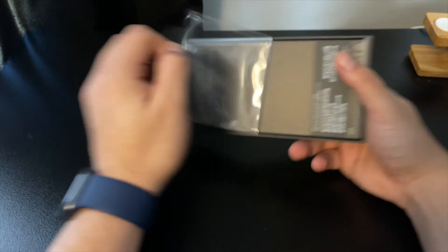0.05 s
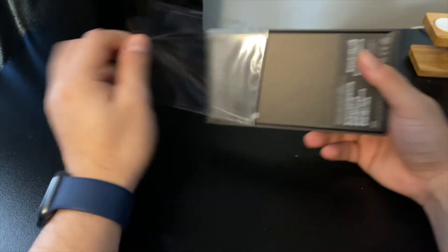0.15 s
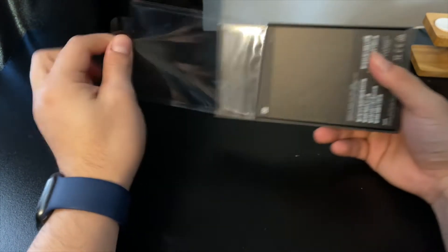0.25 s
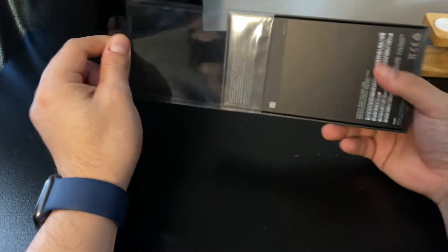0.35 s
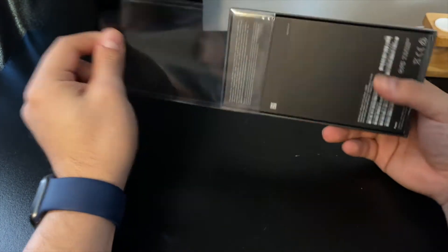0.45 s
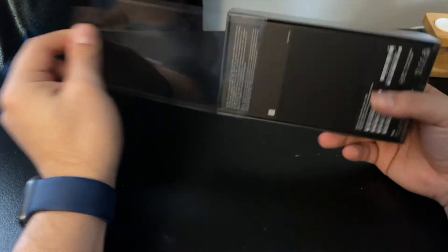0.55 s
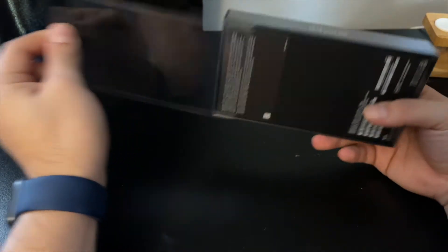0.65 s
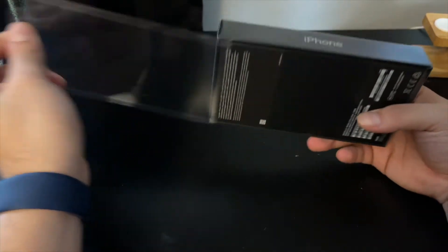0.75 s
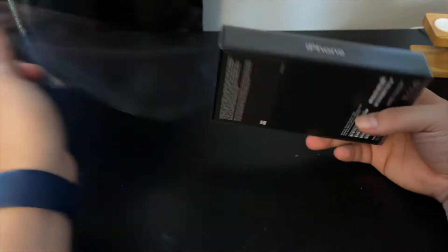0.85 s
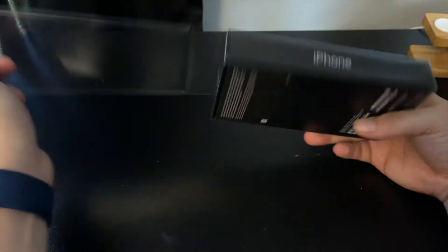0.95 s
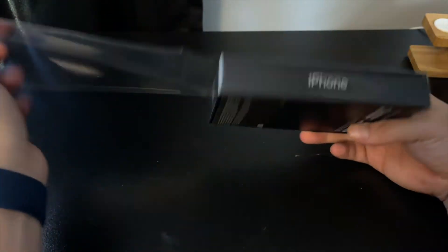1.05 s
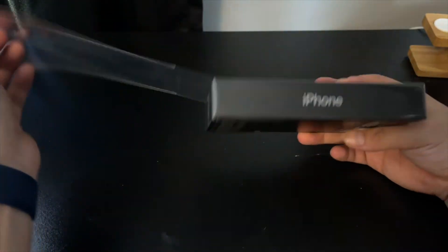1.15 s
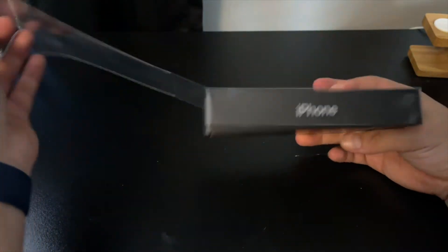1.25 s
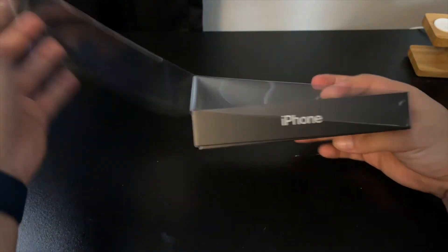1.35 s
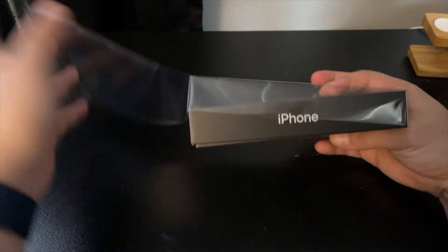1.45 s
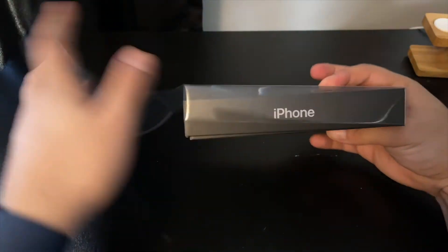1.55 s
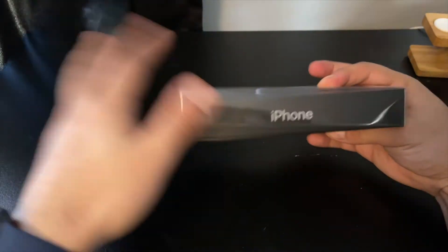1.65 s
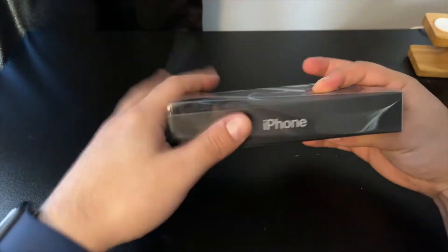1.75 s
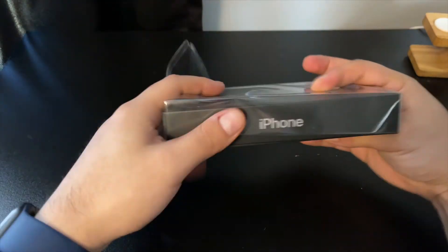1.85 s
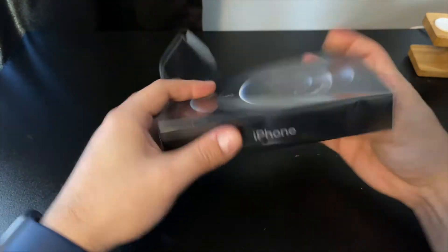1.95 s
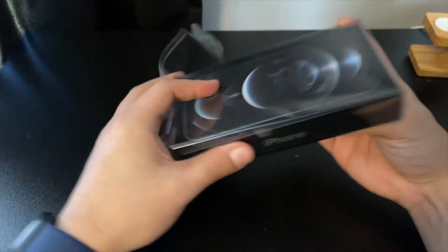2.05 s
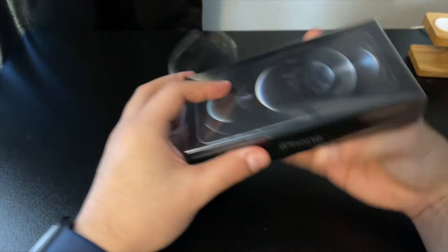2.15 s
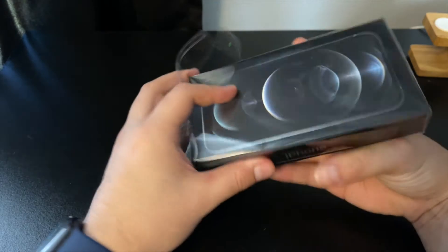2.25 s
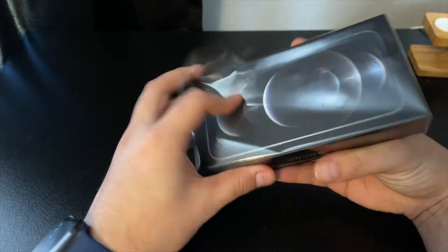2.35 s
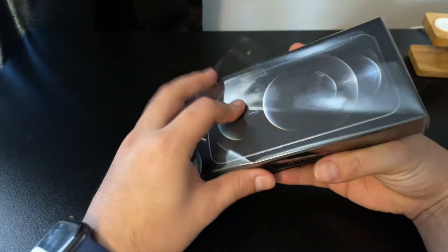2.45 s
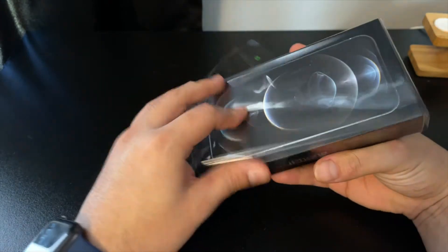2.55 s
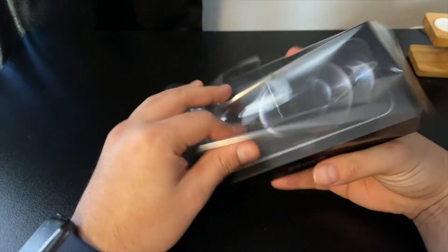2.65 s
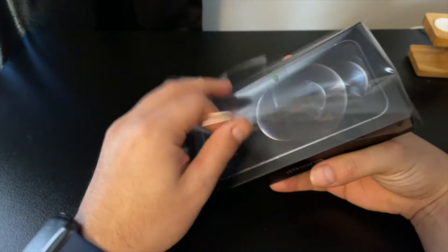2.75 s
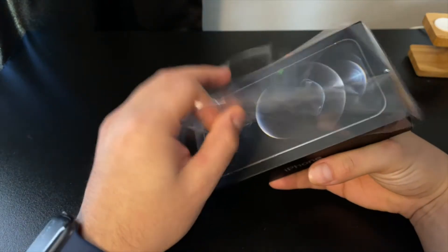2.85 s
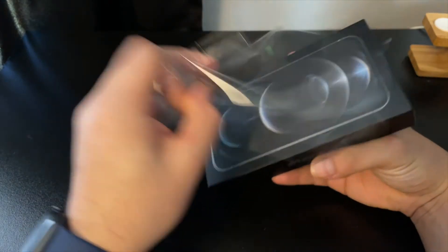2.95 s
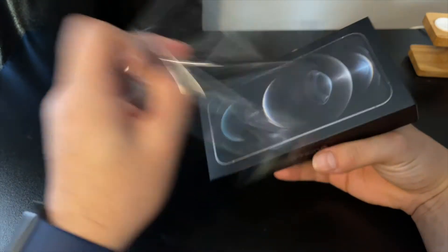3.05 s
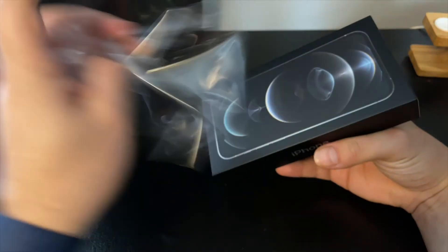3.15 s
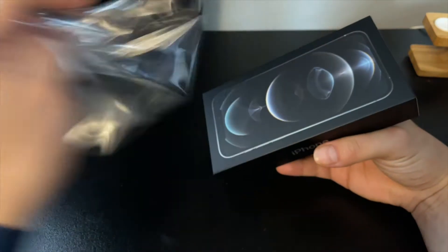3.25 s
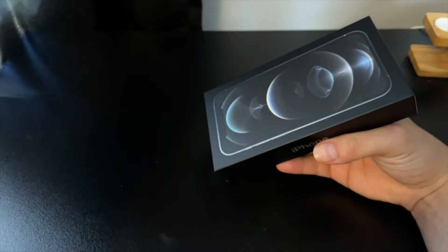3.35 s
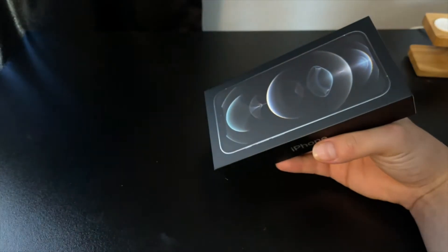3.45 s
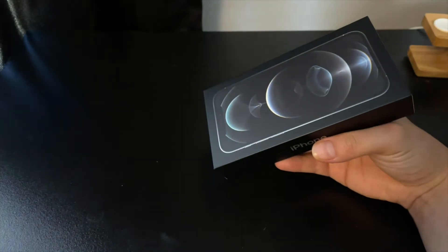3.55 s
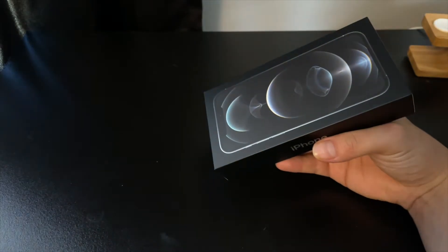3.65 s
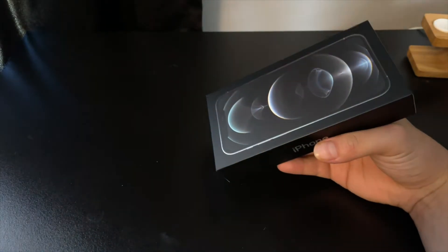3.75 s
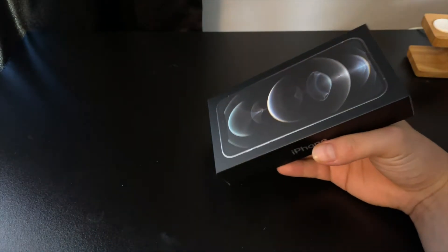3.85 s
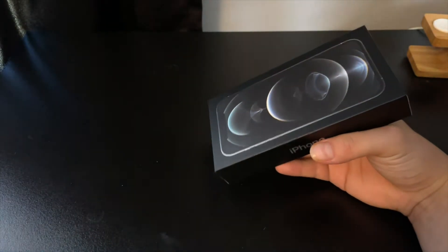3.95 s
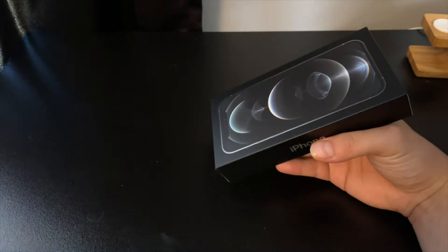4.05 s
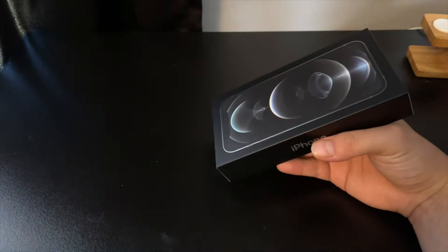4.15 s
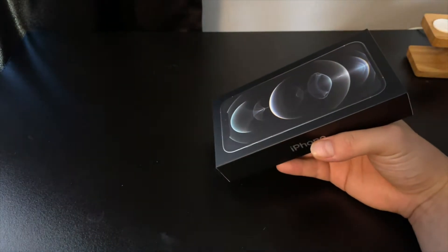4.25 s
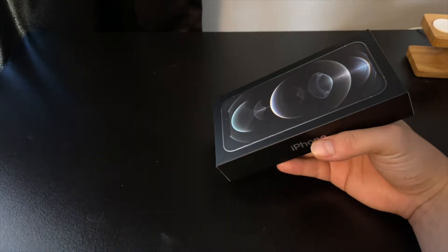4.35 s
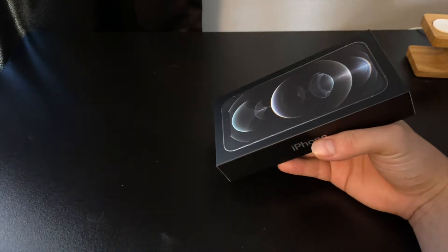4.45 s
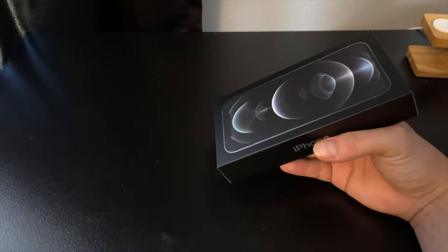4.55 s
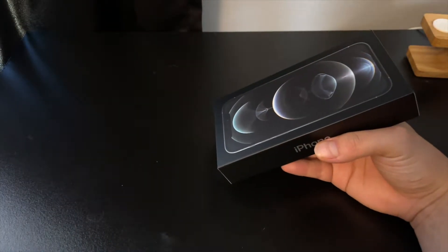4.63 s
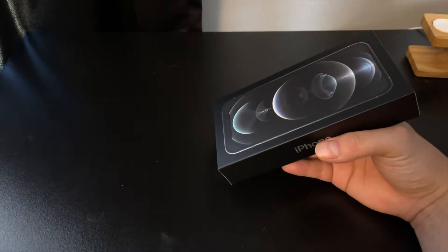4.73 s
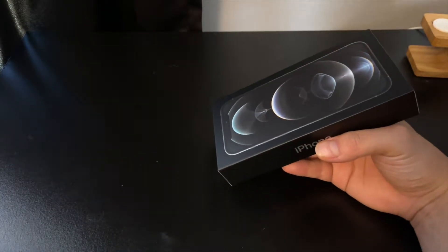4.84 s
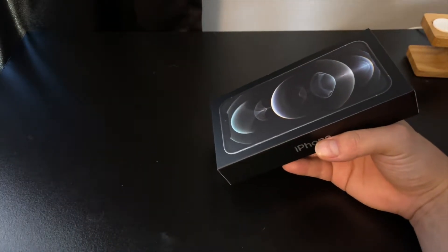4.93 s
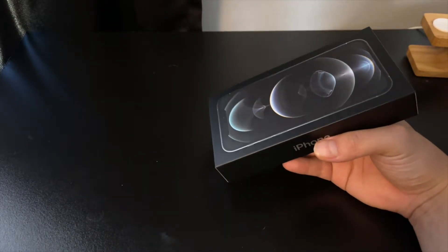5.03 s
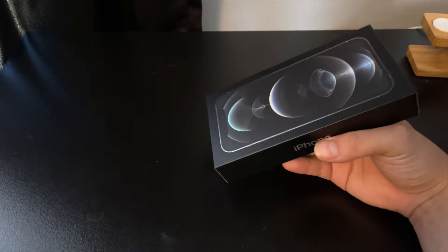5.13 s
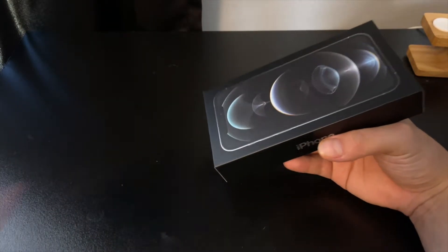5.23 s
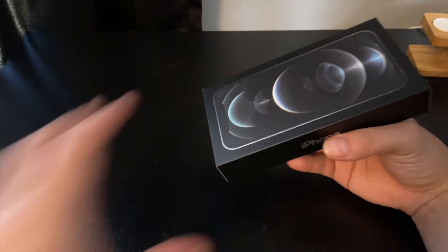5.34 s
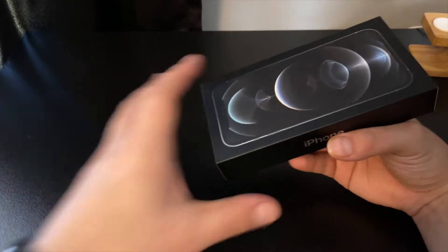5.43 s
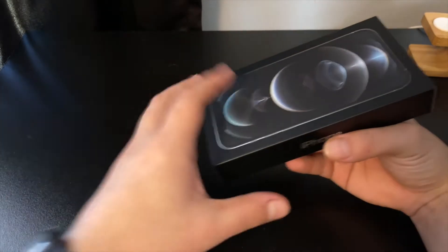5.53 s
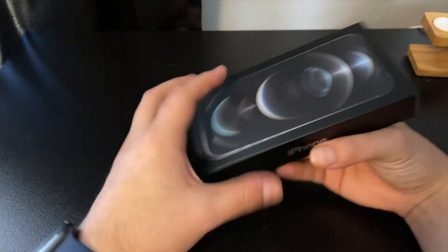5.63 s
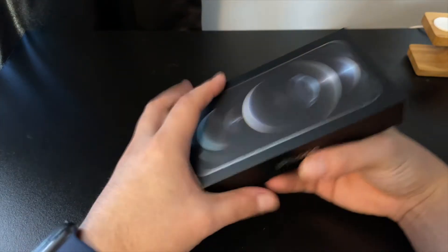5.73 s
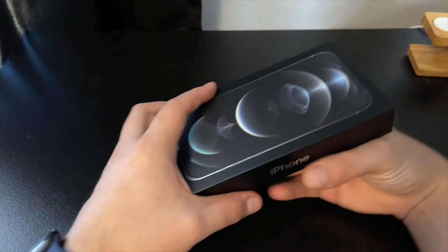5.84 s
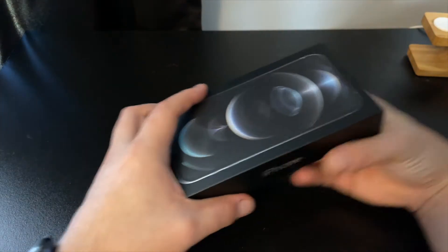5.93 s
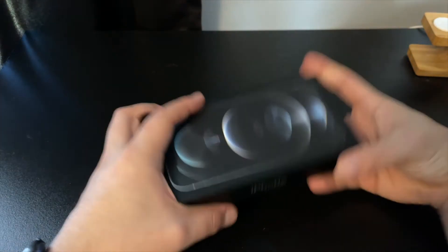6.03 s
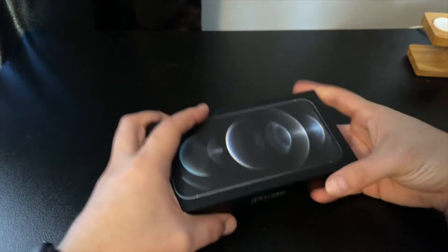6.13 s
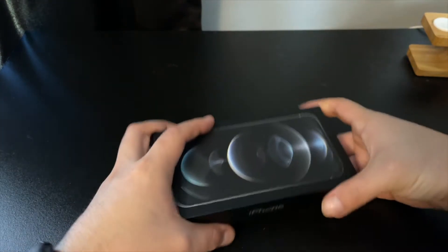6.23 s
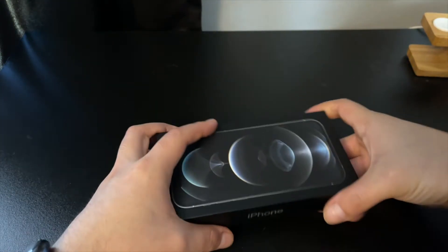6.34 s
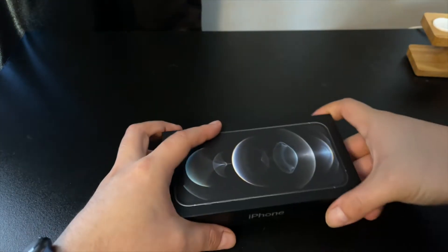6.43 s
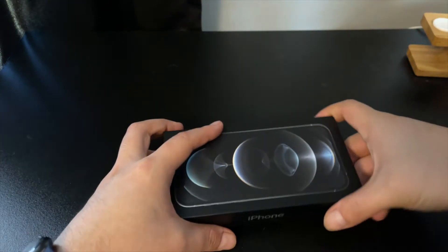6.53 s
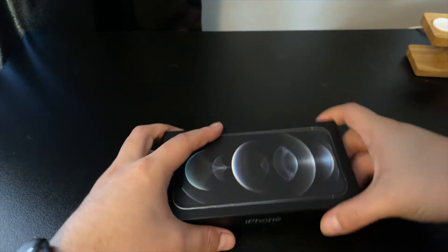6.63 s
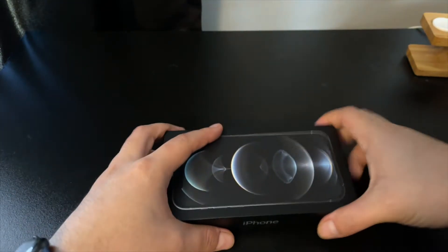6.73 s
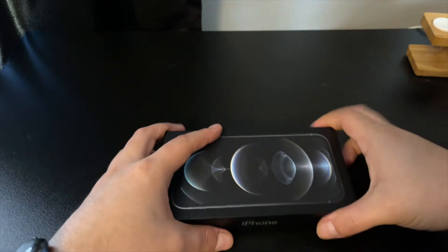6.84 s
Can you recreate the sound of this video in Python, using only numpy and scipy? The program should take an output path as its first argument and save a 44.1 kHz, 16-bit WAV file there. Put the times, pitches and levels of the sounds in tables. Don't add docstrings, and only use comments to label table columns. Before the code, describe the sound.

Close to the microphone in a small quiet room, film peels from a cardboard box with light ticks and one sharp release. Fingers tap the hollow card, then grip and drag the film in bright snaps with a brief squeak. It is balled up in dense loud crackling, carried away with thinning crinkles, and after near silence the box lands on a desk with a soft low thud.

```python
import sys
import numpy as np
from scipy import signal
from scipy.fft import rfft, irfft, next_fast_len
from scipy.io import wavfile
from scipy.ndimage import uniform_filter1d, map_coordinates

SR = 44100
rng = np.random.default_rng(int(sys.argv[2]) if len(sys.argv) > 2 else 0)


def level_to_linear(level):
    exponent = np.asarray(level, float) / 20
    return 10 ** exponent


def file_out(sig):
    cols = np.atleast_2d(sig).T
    lim = np.clip(cols, -1, 1)
    pcm = np.round(lim * 32767).astype(np.int16)
    wavfile.write(sys.argv[1], SR, pcm)


N = 303849
OFF_S = 3.62

# [frequency_hz, density_db]
RUMBLE_SPECTRUM = [(12, -57), (20, -13), (63, 3.5), (88, -11), (138, -2.5), (177, -15.5), (228, -13),
                   (434, -21.5), (574, -21.5), (1000, -31.5), (2320, -35), (2820, -43), (16000, -66)]
# [frequency_hz, decay_s]
ROOM_DECAY = [(200, 0.34), (2000, 0.14), (10000, 0.16)]
# [start_s, peak_db, share_of_ring_time]
SETDOWN = [
    (6.6595, -32, 0.93),
    (6.663, -24.5, 0.83),
    (6.839, -34.5, 0.26),
]
# [frequency_hz, level_db, decay_s]
DESK_MODES = [(120.4, -5.5, 0.15), (178, 1, 0.093), (258, -1, 0.091), (363, -15, 0.17), (500, -2, 0.13),
              (1530, -34, 0.22), (1730, -18, 0.063)]
# [start_s, peak_db, pitch_hz]
BOX_TAPS = [(0.089, -44.5, 320), (0.736, -39.5, 240), (0.753, -35, 433), (0.834, -41, 313),
            (0.849, -28, 368), (0.864, -33.5, 87), (0.898, -42.5, 330), (1.045, -49, 547),
            (1.304, -44, 265), (1.443, -42.5, 258), (1.706, -39.5, 327), (1.731, -44, 151),
            (2.082, -45, 387), (2.133, -49.5, 456), (2.364, -39.5, 437), (4.138, -48.5, 356),
            (2.801, -36, 360), (3.151, -36.5, 302), (3.544, -36, 474), (5.702, -49.5, 539),
            (6.046, -53, 189), (6.087, -48.5, 263), (6.149, -45.5, 152), (6.263, -49.5, 450),
            (6.592, -41, 151)]
# [time_s, slip_rate_hz, level_db]
SQUEAKS = [
    [(2.411, 2050, -56), (2.417, 2180, -46), (2.427, 2180, -44), (2.435, 1880, -48), (2.445, 1450, -48),
     (2.454, 1260, -49), (2.466, 980, -52), (2.49, 560, -58)],
    [(2.899, 1800, -42), (2.906, 1420, -36), (2.915, 1270, -35), (2.928, 1800, -42)],
]
# [frequency_hz, density_db]
FILM_SPECTRUM = [(300, 5), (700, -3), (1500, -3.5), (3000, -2), (6000, -4), (9000, -4), (11000, -10.5),
                 (13000, -5.5), (15500, -6)]
# [time_s, rustle_db]
BUSY_HANDS = [(0, -63), (.26, -79.5), (1.63, -76.5), (1.72, -60.5), (2.1, -66), (2.4, -61), (2.8, -56),
              (3.1, -56), (3.45, -47.5), (3.85, -59), (4.3, -58.5), (4.56, -65.5), (4.63, -71),
              (4.96, -81.5), (5.4, -81), (5.6, -87), (6.89, -90.5)]
# [peak_s, peak_db, rise_s, fall_s, high_part_db]
SQUEEZES = [(1.679, -49, 0.023, 0.085, -11), (2.462, -50.5, 0.08, 0.078, 5.5),
            (2.502, -38.5, 0.035, 0.1, -6.5), (2.925, -42, 0.36, .12, -7.5),
            (3.018, -35.5, 0.022, 0.037, -11), (3.12, -39, 0.019, 0.18, -7), (3.25, -47.5, 0.045, 0.22, -8),
            (3.292, -34, 0.013, 0.057, 1.5), (3.43, -47.5, 0.076, 0.49, 0), (3.512, -35, .008, 0.061, -3.5),
            (3.553, -34, 0.048, 0.082, 1.5), (3.74, -46.5, 1, 0.033, -2.5), (3.83, -44.5, 0.16, 0.057, 3.5),
            (3.991, -46, 0.04, 0.043, 0.5), (4.11, -47.5, 0.11, 0.11, -3.5),
            (4.221, -51, 0.41, 0.097, -1.5), (4.419, -46, 0.065, 0.097, -26.5),
            (4.512, -42, 0.25, 0.075, -5.5)]
# [peak_s, peak_db, rise_s, fall_s, high_part_db]
RUBS = [(.8, -67.5, 0.35, 0.052, -9), (.9, -58.5, 0.24, 0.068, -42), (1.2, -86, 0.2, 0.2, 23),
        (1.269, -56.5, 0.063, 0.15, -13), (1.46, -51.5, 0.067, 0.061, -45),
        (4.881, -64, 0.091, 0.057, -2.5), (5.49, -76.5, 0.11, 0.2, -1.5),
        (5.679, -68.5, 0.089, 0.78, -27.5), (5.88, -73.5, 0.15, 0.12, 12), (6.121, -74.5, 0.19, 0.092, 1),
        (6.299, -65.5, 0.21, 0.14, -6), (6.635, -64.5, 0.23, 0.1, -21), (6.89, -71, 0.41, .1, -18)]
# [start_s, peak_db, ring_hz]
PEEL = [(.0179, -35.5, 2690), (.0688, -46, 3200), (.133, -34.5, 3520), (.157, -37, 6200),
        (.2367, -48, 6800), (.3174, -40.5, 6500), (.38, -44, 6340), (.4003, -50, 6140), (.411, -41, 8400),
        (.4586, -41.5, 8200), (.475, -41, 6400), (.5048, -40, 8200), (.6587, -40.5, 6500),
        (.6668, -48, 6500), (.6743, -43, 9560), (.691, -47, 7600), (.7338, -17.5, 6800),
        (.753, -24.5, 4000), (.9212, -47, 1240), (1.2737, -33.5, 3320)]
# [start_s, peak_db, ring_hz]
TOUCH = [(.839, -31.5, 1840), (.8497, -26.5, 3970), (.912, -41.5, 3250), (.944, -56, 1170),
         (1.0022, -54, 885), (1.048, -51, 2260), (1.1821, -43.5, 2250), (1.2629, -31.5, 3700),
         (1.2775, -38.5, 1080), (1.305, -33, 1930), (1.4389, -29.5, 3400), (1.445, -24.5, 3920),
         (1.4766, -48, 2400), (1.5552, -41, 8300), (4.6665, -51, 5400), (4.6657, -49, 1110),
         (4.7085, -41, 3120), (4.858, -41.5, 4300), (4.865, -46, 3430), (4.881, -53, 4500),
         (5.0497, -50, 6870), (5.0568, -55.5, 2190), (5.1981, -54, 994), (5.4658, -53, 6550),
         (5.472, -52, 3020), (6.262, -50, 1295), (6.6306, -47.5, 2100)]
# [start_s, peak_db, ring_hz]
LANDING = [(6.6602, -19, 1596), (6.6625, -34.5, 3170), (6.6678, -30, 1690)]
# [contact_rows, high_part_db, low_part_db]
CONTACT_COLOURS = [(PEEL, -5, -14.5), (TOUCH, -21, -8), (LANDING, -52, -11)]
# [start_s, peak_db, ring_hz, high_part_db, low_part_db]
LAST_TAP = [(6.837, -48, 6850, -29, -2), (6.839, -39, 2975, -30, 2.5)]
# [start_s, peak_db,
# ring_hz, high_part_db, low_part_db]
FURTHER_SNAPS = [(1.8417, -21.5, 8500, -12, -13), (2.023, -35, 1570, -5, -7), (2.037, -23, 2340, -19, -11),
                 (2.3124, -19, 2980, -15, -30), (0.7558, -30.5, 2000, -10, -15), (3.288, -13, 8300, 3, -29)]
# [start_s, peak_db, ring_hz, high_part_db, low_part_db]
GRIP = [(1.6828, -27.5, 3440, -5, -15), (4.8435, -50, 3520, -18, -21), (1.7214, -33.5, 1190, -6, -9),
        (1.732, -35.5, 1000, -19, -6), (1.7611, -31, 7360, -21, -23), (1.7646, -27, 3600, -6, -29),
        (1.7725, -44, 3010, -6, -24), (1.7901, -23.5, 3100, -9, -14), (1.8167, -28, 1400, -1, -18),
        (1.823, -33, 5900, -9, -25), (1.8415, -13, 3130, -0.5, -45), (1.9444, -43, 2580, -4, -6),
        (1.9496, -42.5, 3400, -3, -4), (1.9767, -32.5, 3190, -13, -10), (1.9855, -17, 3260, 0.5, -14),
        (1.9953, -34.5, 1190, -11, -17), (2.0354, -15.5, 4700, -2, -44), (2.093, -53, 2260, -7, -17),
        (2.1488, -34.5, 4000, 0.5, -21), (2.205, -30, 4270, -5, -10), (2.2401, -18, 3620, -0.5, -33),
        (2.2466, -31.5, 2050, -29, -18), (2.291, -27.5, 1170, 2, -22), (2.316, -26, 1020, -8, -22),
        (2.3347, -37, 3140, -17, -16), (2.3654, -14.5, 7600, -5, -13.5), (2.3725, -27, 5340, -10, -20),
        (2.385, -35, 2800, -9, -19)]
# [start_s, peak_db, ring_hz, high_part_db, low_part_db]
DRAW = [(2.41, -36, 1020, -2, -17), (2.4243, -35, 2150, -1, -28), (2.4795, -28, 3500, -12, -24),
        (2.5021, -10.5, 7340, 0.5, -28.5), (2.511, -31, 7890, -2, -17.5), (2.526, -18, 1460, -10, -14),
        (2.532, -23.5, 2630, -7, -14), (2.54, -21.5, 2875, -16.5, -28), (2.5773, -28, 2370, -20, -5),
        (2.5952, -32, 2650, -4, -23), (2.6196, -32.5, 2330, -19, -14), (2.6287, -34.5, 1840, -19, -16),
        (2.6366, -14, 2130, -3.5, -29), (2.6516, -11, 6320, -3.5, -28), (2.6726, -13, 2854, -6, -12.5),
        (2.679, -29, 9170, -3, -6), (2.6985, -9.5, 5430, -7.5, -14), (2.7361, -30, 3410, -16, -20),
        (2.77, -37, 1030, -19, -15), (2.782, -21.5, 2310, -11, -8.5), (2.7903, -29, 3300, -13, -5),
        (2.799, -22, 3360, -9, -24), (2.8054, -25, 3490, -16, -21), (2.8095, -16.5, 1160, 0, -19.5),
        (2.821, -26.5, 2280, -14.5, -12), (2.8341, -23, 3330, -7.5, -14), (2.8365, -11.5, 3400, -4, -11.5),
        (2.8551, -21, 2900, -11, -26.5), (2.8698, -12, 3240, -0.5, -8), (2.874, -23, 1970, -7, -26.5),
        (2.897, -13.5, 3920, 13.5, -30), (2.865, -25, 4800, -5.5, -27), (2.936, -22, 3770, -9.5, -9),
        (2.9613, -14.5, 9200, -1, -32), (2.9595, -18, 9500, 2, -28), (2.9983, -29, 7490, -8, -26.5)]
# [start_s, peak_db, ring_hz, high_part_db, low_part_db]
CRUSH = [(3.006, -22.5, 3900, -10, -20), (3.0149, -22.5, 1900, -12.5, -4), (3.0222, -21, 3300, -11.5, -12),
         (3.0275, -22.5, 2970, 1, -10.5), (3.036, -20.5, 1930, -4, -22), (3.0652, -26, 4000, -12, -15),
         (3.0759, -20.5, 2840, -12, -9.5), (3.0844, -27, 3250, -9, -22), (3.0879, -18, 2370, -6, -27),
         (3.1034, -20, 6030, -4, -10), (3.1094, -22.5, 2046, -14, -5), (3.117, -20.5, 2950, 10, -22),
         (3.1312, -20.5, 3980, -1.5, -28), (3.15, -21, 4260, 0, -15.5), (3.1593, -26, 3830, -21, -19.5),
         (3.1691, -16, 8800, -5, -25), (3.1772, -19, 2010, -4.5, -37), (3.1815, -18, 2920, -13, -25),
         (3.194, -20.5, 3930, -12.5, -23), (3.201, -25, 2090, -25, -6), (3.2069, -18.5, 2055, -19.5, -4.5),
         (3.2153, -26.5, 2050, -13, -19), (3.236, -20, 1380, -13.5, -9),
         (3.2423, -41.5, 1980, -16.5, -19.5), (3.2542, -20.5, 2030, -8.5, -21),
         (3.2658, -19.5, 4060, -6, -19), (3.2755, -22.5, 3050, -8.5, -13.5), (3.28, -22.5, 9390, -2.5, -33),
         (3.29, -16.5, 3140, -7.5, -29), (3.294, -18.5, 3170, -10, -22.5)]
# [start_s, peak_db, ring_hz, high_part_db, low_part_db]
SQUASH = [(3.316, -19, 2810, -10.5, -13.5), (3.346, -16, 7580, -5, -14), (3.3568, -20.5, 3477, -10.5, -11),
          (3.3856, -23, 5560, -9.5, -25), (3.4004, -33.5, 3890, -9, -17), (3.4106, -17.5, 3120, -1, -32.5),
          (3.421, -22.5, 3070, -7, -12), (3.4317, -41.5, 2904, -10, -5), (3.4411, -24, 2740, -8, -23),
          (3.4507, -24, 4090, -9, -13), (3.458, -26.5, 1455, -9, -17.5), (3.4632, -25.5, 2370, -5, -20.5),
          (3.472, -26, 2930, -5, -19.5), (3.4767, -30, 2800, -9, -22), (3.509, -10.5, 2544, -5.5, -15.5),
          (3.5178, -16.5, 1478, -4.5, -21.5), (3.533, -17.5, 2550, 2.5, -34),
          (3.5397, -10, 8640, -11.5, -25.5), (3.5484, -17.5, 1340, -4.5, -9),
          (3.5578, -14, 3980, -9.5, -13.5)]
# [start_s, peak_db, ring_hz, high_part_db, low_part_db]
AWAY = [(3.614, -25, 2400, -13, -22), (3.6314, -41, 8910, -3, -20), (3.6547, -20, 10210, 12, -27),
        (3.6707, -15.5, 3670, 8, -23), (3.6858, -23, 7940, -13, -11), (3.6991, -17, 9400, -9, -20),
        (3.7127, -18, 4560, 9.5, -1), (3.7666, -30, 8150, -18, -15), (3.7837, -25, 3040, -6, -8),
        (3.7914, -21.5, 7900, -17, -18), (3.7947, -23, 6600, -16, -16), (3.8116, -39, 1740, 2, -6),
        (3.827, -32, 4670, -11, -19), (3.8728, -32, 4090, -7, -25), (3.9027, -26.5, 3480, 5, -12),
        (3.928, -30, 3550, -18, -8), (3.944, -24.5, 1490, -3, -33), (3.961, -41, 3830, -12, -21),
        (3.9831, -20.5, 3800, -4, -18), (4.0536, -35.5, 1740, -14, -8), (4.0815, -29, 3750, -1, -9),
        (4.1209, -37, 2410, 0, -13), (4.158, -41, 1890, -15, -21), (4.216, -41, 1340, -10, -23),
        (4.3161, -42, 1530, -19, -12), (4.3464, -33.5, 3070, -4, -26), (4.3769, -29.5, 2930, -11, -10),
        (4.397, -32, 2300, -2, -10), (4.4059, -31, 2860, -14, -19), (4.4122, -30, 2000, 1, -8),
        (4.4292, -33, 5600, -8, -12), (4.4375, -41, 2710, -14, -12), (4.483, -20.5, 1080, 10, -6.5),
        (4.492, -28.5, 2330, -19, 0)]


def unit(x):
    return x / np.sqrt(np.mean(x ** 2) + 1e-20)


def peak_one(rows):
    return rows / np.abs(rows).max(axis=1, keepdims=True)


def along(points, hz):
    f, v = np.transpose(points)
    return np.interp(np.log(hz + 1), np.log(f + 1), v)


def curves(rows):
    s, *cols = np.transpose(rows)
    return [np.interp(np.arange(N) / SR, s, c) for c in cols]


def filtered(x, response):
    n = x.shape[-1]
    m = next_fast_len(n + 4096)
    return irfft(rfft(x, m) * response(np.fft.rfftfreq(m, 1 / SR)), m)[..., :n]


def resonance(centre_hz, width_hz):
    return lambda f: 1j * f * width_hz / (centre_hz ** 2 - f * f + 1j * f * width_hz + 1e-9)


def wobble(rate):
    return map_coordinates(rng.standard_normal(int(N * rate / SR) + 4), [np.arange(N) * rate / SR])


def placed(times, rows):
    at = np.round(np.asarray(times) * SR).astype(int)[:, None] + np.arange(rows.shape[1])
    return np.bincount(at.ravel(), rows.ravel(), N + SR)[:N]


def room_tone():
    shape = lambda f: level_to_linear(along(RUMBLE_SPECTRUM, f)) * (1 + 1.1 * resonance(2280, 120)(f))
    noise = filtered(rng.standard_normal(N), shape)
    level_db = -60 + 0.19 * wobble(0.73)
    hum_db = -8.5 + 1.7 * wobble(6)
    hum_hz = 56 * (1 + 0.0498 * wobble(8.7))
    hum = np.sin(2 * np.pi * np.cumsum(hum_hz) / SR)
    return level_to_linear(level_db) * (unit(noise) + level_to_linear(hum_db) * hum)


def room(x):
    tails, turns_per_s = 5, 300
    hz, t, z = signal.stft(rng.standard_normal((tails, SR // 3)), SR, nperseg=256)
    z = z / np.sqrt(np.abs(z))
    decay = level_to_linear(-60 * t / along(ROOM_DECAY, hz)[:, None])
    tail = signal.istft(z * decay, SR, nperseg=256)[1]
    turn = np.arange(N) / SR * turns_per_s - np.arange(tails)[:, None]
    share = np.clip(1 - np.abs((turn + tails / 2) % tails - tails / 2), 0, 1)
    wet = signal.fftconvolve(x * share, tail / np.linalg.norm(tail[0]), axes=1)
    return np.pad(wet.sum(axis=0), (120, 0))[:N]


def setdown():
    s, db, free = np.transpose(SETDOWN)[:, :, None]
    t = np.arange(SR // 3) / SR
    ring = 0
    for hz, level_db, t60 in DESK_MODES:
        mode_db = level_db + rng.normal(0, 1, s.shape) - 60 * t / (free * t60)
        ring = ring + level_to_linear(mode_db) * np.sin(2 * np.pi * hz * t)
    ring = ring * (1 - np.exp(-t / 0.0027))
    puff = rng.standard_normal((len(s), len(t))) * level_to_linear(-60 * t / (0.17 * free))
    hollow = lambda f: resonance(330, 400)(f) ** 2 + 0.1 * resonance(1600, 1500)(f) ** 2
    rattle = 0.5 * peak_one(filtered(puff, hollow))
    return placed(s[:, 0], level_to_linear(db) * (1.28 * ring + rattle))


def taps():
    s, db, hz = np.transpose(BOX_TAPS)[:, :, None]
    t = np.arange(SR // 5) / SR
    puff = rng.standard_normal((len(s), len(t))) * level_to_linear(-60 * t / .05) * (1 - np.exp(-t / 0.0026))
    puff = filtered(filtered(puff, resonance(1.6 * hz, 8.6 * hz)), resonance(hz, hz))
    body = level_to_linear(-60 * t / 0.037) * np.sin(2 * np.pi * hz * t) * (1 - np.exp(-t / 0.00014))
    return placed(s[:, 0], level_to_linear(db) * (0.85 * body + 0.82 * peak_one(puff)))


def squeak(rows, weights_db):
    hz, db = curves(rows)
    phase = 2 * np.pi * np.cumsum(hz * (1 + .02 * wobble(350))) / SR
    tone = 0
    for k, weight_db in enumerate(weights_db):
        overtone_db = weight_db + (1.5 + k) * wobble(90)
        tone = tone + level_to_linear(overtone_db) * np.sin((k + 1) * phase)
    t = np.arange(N) / SR
    slipping = (t > rows[0][0]) * (t < rows[-1][0])
    return level_to_linear(db) * filtered(tone * slipping, lambda f: 1 / (1 + (f / 8000) ** 4))


def strokes():
    s, db, rise, fall, high_db = np.transpose(SQUEEZES + RUBS)[:, :, None]
    t = np.arange(0, N + 64, 64) / SR
    drop_db = 23.5
    swell = level_to_linear(db - drop_db * np.where(t < s, (s - t) / rise, (t - s) / fall)) ** 2
    busy_db = np.interp(t, *np.transpose(BUSY_HANDS))
    busy = level_to_linear(busy_db) ** 2
    power = busy + swell.sum(axis=0)
    busy_high_db = -6.5 + 0.14 * (busy_db + 72)
    high = busy * level_to_linear(busy_high_db) ** 2 + (swell * level_to_linear(high_db) ** 2).sum(axis=0)
    skin = swell[len(SQUEEZES):].sum(axis=0) / power
    rows = np.transpose([t, 10 * np.log10(power), 10 * np.log10(high / power), skin])
    level_db, high_db, skin = curves(rows)
    low_db = -5 - 0.38 * (level_db + 63.5)
    return level_db, low_db, high_db, skin


def crackle(count):
    s, pitch, size, life = rng.random((count, 4)).T[:, :, None]
    t = np.arange(128) / SR
    hz = 800 * 18 ** pitch
    level_db = -5.5 * np.log(size + 0.054) - 60 * t * hz / (5 + 9 * life)
    grains = level_to_linear(level_db) * np.sin(2 * np.pi * hz * t)
    return unit(placed(s[:, 0] * N / SR, grains * np.sqrt(hz)))


def crumple():
    level_db, low_db, high_db, skin = strokes()
    t = np.arange(N) / SR
    grainy = np.clip((level_db + 68) / 25, 0, .55) * np.where(t < OFF_S, 1, .8)
    mixed = (grainy * crackle(count=12000) + rng.standard_normal(N)) / np.sqrt(1 + grainy ** 2)

    z = signal.stft(mixed, nperseg=128)[2]
    field = uniform_filter1d(rng.standard_normal(z.shape), size=3, axis=0)
    field = uniform_filter1d(field, size=8, axis=1)
    rustle = signal.istft(z * level_to_linear(2.8 * unit(field)), nperseg=128)[1][:N]
    rustle = rustle * level_to_linear(2.7 * wobble(45))

    def band(low_hz, high_hz):
        skirts = lambda f: np.sqrt((1 + (low_hz / (f + 1)) ** 6) * (1 + (f / high_hz) ** 6))
        return unit(filtered(rustle, lambda f: level_to_linear(along(FILM_SPECTRUM, f)) / skirts(f)))

    free_film = (t > OFF_S + .2) & (level_db > -66)
    low = np.where(free_film, band(630, 1830), band(380, 1400))
    parts = band(1600, 5300) + level_to_linear(low_db) * low + level_to_linear(high_db) * band(9400, 10000)
    parts += level_to_linear(high_db - 4.5) * (skin + 0.16) * band(12000, 22000)
    return level_to_linear(level_db) * parts


def snaps():
    light = [(*row, *colour_db) for rows, *colour_db in CONTACT_COLOURS for row in rows]
    events = light + LAST_TAP + FURTHER_SNAPS + GRIP + DRAW + CRUSH + SQUASH + AWAY
    s, db, hz, high_db, low_db = np.transpose(events)[:, :, None]
    high_db = high_db + 2 * rng.standard_normal(s.shape)
    t = np.arange(1024) / SR

    length_s = .0105 * level_to_linear(1.5 * rng.standard_normal(s.shape))
    noise, clusters = rng.standard_normal((2, len(s), len(t)))
    spiky = noise * level_to_linear(2.7 * uniform_filter1d(clusters, size=12, axis=1))
    decay = level_to_linear(-60 * t / length_s) + .06 * level_to_linear(-60 * t / .04)
    burst = spiky * decay * (1 - np.exp(-t / .0002))
    click = 1.28 * level_to_linear(.2 * (db + 22)) * np.abs(burst).max(axis=1, keepdims=True)
    burst = burst + click * (np.arange(len(t)) == 8)

    def twice(centre_hz, width_hz):
        return peak_one(filtered(burst, lambda f: resonance(centre_hz, width_hz)(f) ** 2))

    patch = 0.34 * twice(hz, 0.53 * hz)
    broad = level_to_linear(0.44 * high_db) * twice(5530, 11000)
    box = level_to_linear(-26.5) * (s < OFF_S) * twice(400, 530)
    edge_hz = np.clip(45000 * level_to_linear(0.48 * high_db), 2600, 30000)
    body = filtered(patch + broad + box, lambda f: 1 / (1 + 1j * f / edge_hz) ** 3)
    low = level_to_linear(low_db - 4.0) * twice(1130, 600)
    high = level_to_linear(high_db - 2.5) * twice(9420, 14000)
    return placed(s[:, 0], level_to_linear(db) * peak_one(peak_one(body) + high + low))


def scene():
    faint_squeak = squeak(SQUEAKS[0], [2, -14, -6, -2, -6, -9, -10, -12])
    loud_squeak = squeak(SQUEAKS[1], [-16, 0, -4, -11, -12])
    port = lambda f: 1 - 0.58 * resonance(11300, 2600)(f)
    hits = filtered(snaps(), port) + taps() + faint_squeak + loud_squeak
    rustle = crumple()
    thud = setdown()
    wet = room(level_to_linear(-8.5) * hits + level_to_linear(-6.0) * rustle + 0.1 * thud)
    return (hits + rustle + thud + wet + room_tone())[None]


def top_cut(x):
    return signal.sosfilt(signal.butter(12, 16990, fs=SR, output="sos"), x)


def record(dry):
    band_limit = lambda f: 1j * f / (25 + 1j * f) / np.sqrt(1 + (f / 15750) ** 120)
    return top_cut(filtered(dry, band_limit))


dry = scene()
out = record(dry)
file_out(out)
```